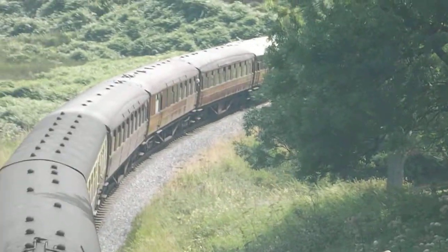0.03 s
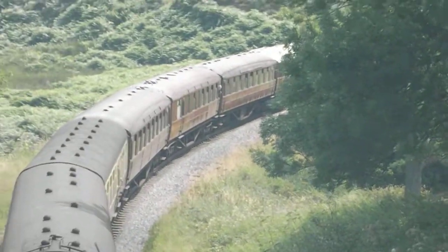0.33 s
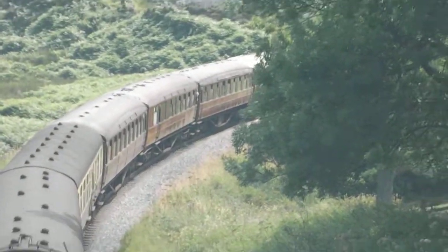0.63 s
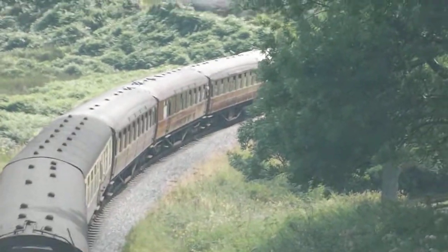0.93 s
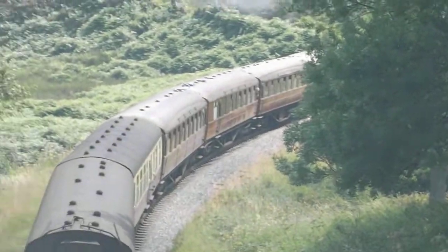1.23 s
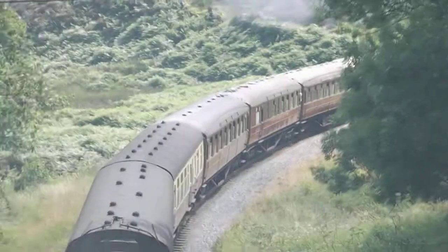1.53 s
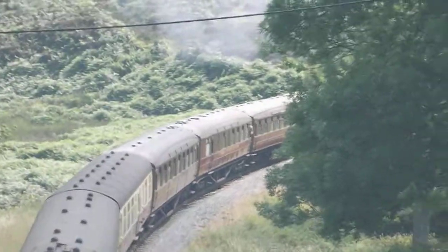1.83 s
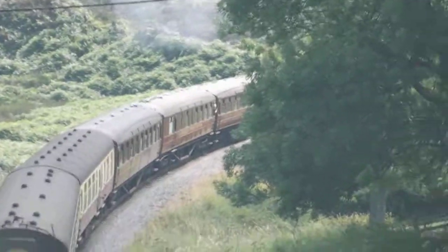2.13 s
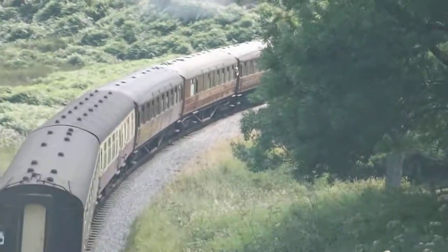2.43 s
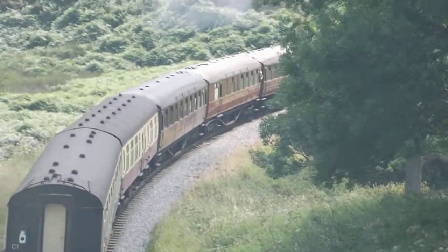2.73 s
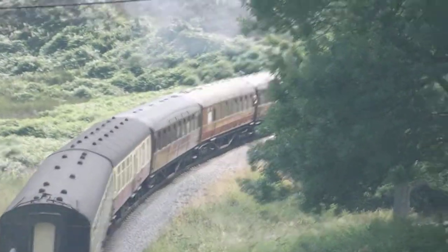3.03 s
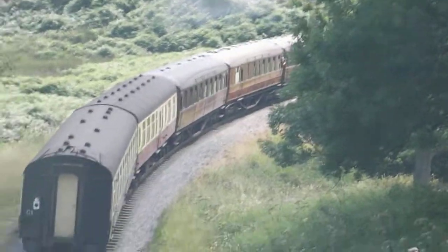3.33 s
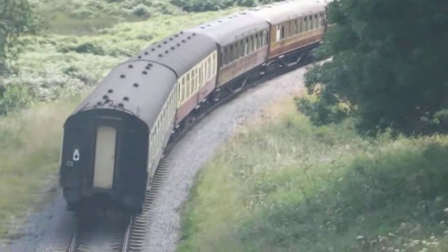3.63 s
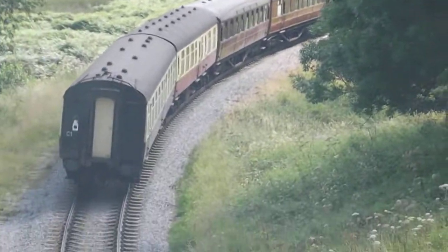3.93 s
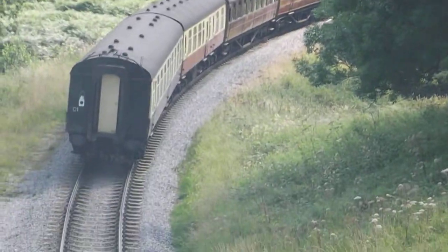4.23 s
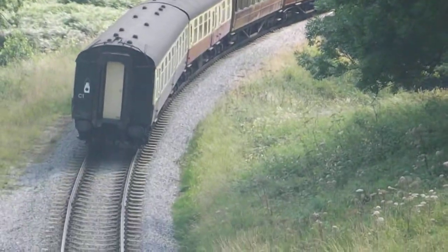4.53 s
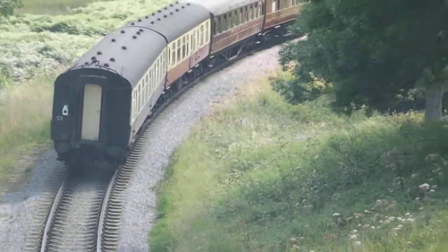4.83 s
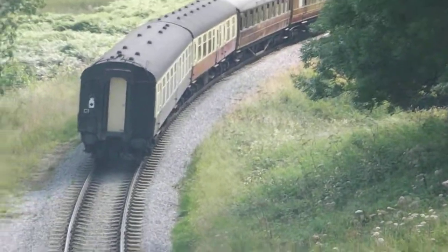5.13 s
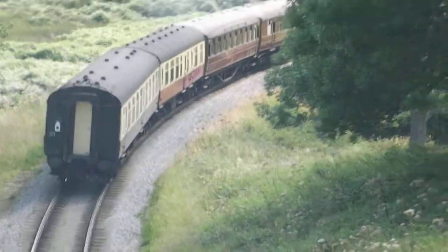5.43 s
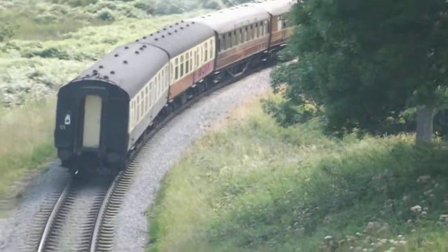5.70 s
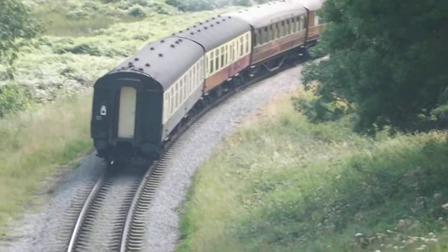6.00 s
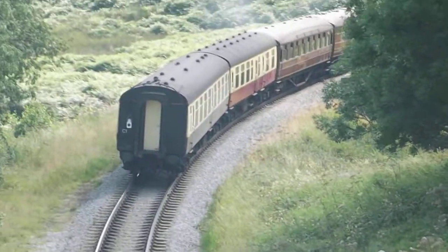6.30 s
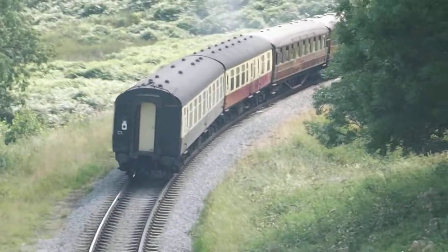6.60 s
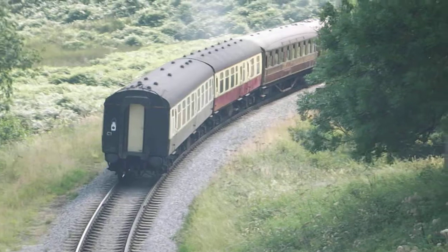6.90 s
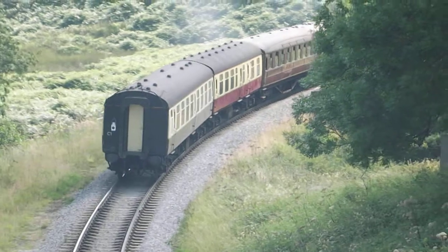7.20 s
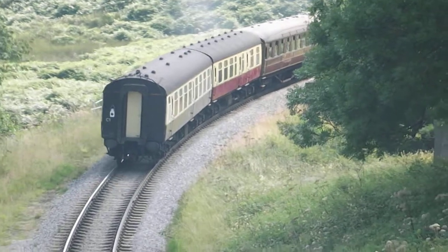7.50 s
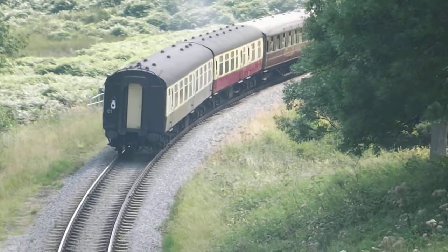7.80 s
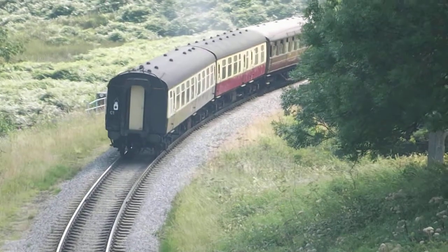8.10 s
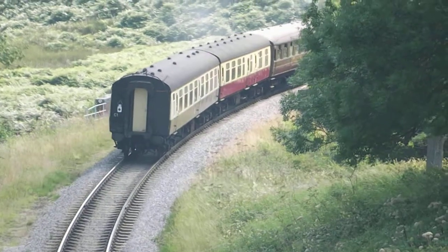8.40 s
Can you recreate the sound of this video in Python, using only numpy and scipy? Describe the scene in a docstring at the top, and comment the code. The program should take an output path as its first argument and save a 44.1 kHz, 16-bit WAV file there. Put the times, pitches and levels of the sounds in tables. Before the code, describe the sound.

Quick, steady chuffing of a departing steam train over a steam hiss and wheel rumble, with wind thumps and a few sharp clicks.

```python
"""A steam locomotive works a passenger train away round a curve in open country, 5.4 beats a second.
Each exhaust beat is a low push of air, a blast of steam with a rasp on top, and a hoot of the chimney,
coloured by the grass and echoed by the slopes. Under it sits a bed of leaking steam, rolling coaches
and rubbing flanges. A breeze buffets the microphone, a few sharp clicks sound close by,
and a limiter ducks the mix after the peaks."""
import sys
import numpy as np
from scipy import signal
from scipy.fft import rfft, irfft, next_fast_len
from scipy.io import wavfile

SR = 44100
rng = np.random.default_rng(int(sys.argv[2]) if len(sys.argv) > 2 else 0)


def master(y):
    """Save y as 16-bit WAV."""
    cut = np.clip(np.atleast_2d(y).T, -1, 1)
    pcm = np.round(cut * 32767)  # scale
    wavfile.write(sys.argv[1], SR, pcm.astype(np.int16))


N = 377055
TIME = np.arange(N) / SR
BEAT_S = 0.18532  # four beats to a turn of the driving wheels

# Table levels are relative: each layer is trimmed where it is played.
# Tone of each noise layer: (frequency [Hz], level [dB])
WIND_SPECTRUM = [(8, -27), (22, -1.5), (45, -5.5), (80, -6), (125, -13), (200, -26), (400, -27.5),
                 (900, -74)]
ROLL_SPECTRUM = [(60, -4), (140, 3), (260, 0), (420, -1.5), (580, -1), (760, -6), (900, -6.5), (1100, -7),
                 (1600, -9.5), (1760, -3), (1980, -10.5), (2400, -6.5), (3600, -26), (8000, -82)]
LEAK_SPECTRUM = [(1500, -12), (2400, -7.5), (3250, 3), (3650, -3.5), (4300, -15), (5000, -23), (5700, -32),
                 (6800, -28), (8200, -24.5), (9400, -27.5), (11000, -46), (15000, -67)]
FIZZ_SPECTRUM = [(5500, -20), (7000, -6.5), (8200, 1), (9400, -6), (11000, -20), (15000, -47)]
TICK_SPECTRUM = [(1500, -39), (3200, 7), (5200, -15), (8200, 10), (10000, 0.5), (13000, -9), (16000, -36)]
PUSH_SPECTRUM = [(25, -22), (50, -8), (80, -4), (108, -3), (160, -22), (400, -64)]
BLAST_SPECTRUM = [(40, -32), (100, -20.5), (155, 2.5), (250, 0), (320, 0), (355, -2), (410, 2), (475, -2),
                  (570, -2.5), (650, -7.5), (760, -19.5), (1100, -63), (3000, -90)]
RASP_SPECTRUM = [(500, -6), (720, -7), (840, 4.5), (1080, 0), (1230, 6), (1420, 3), (1900, 0.5),
                 (2600, -1.5), (3250, 1.5), (3650, -3.5), (4300, -18.5), (5700, -41), (8100, -27),
                 (13000, -61)]

# Fader ride of each layer: (time [s], level [dB])
WIND_LEVEL = [(0, -38), (0.25, -40), (0.55, -30), (0.9, -45), (1.7, -41), (3.0, -41.5), (3.7, -29),
              (4.7, -28.5), (4.95, -32), (5.45, -39), (5.8, -28), (6.6, -46), (7.3, -39.5), (8.55, -42.5)]
ROLL_LEVEL = [(0, -33), (0.7, -32.5), (1.0, -33.5), (2.0, -31), (3.3, -33), (5.0, -33.5), (6.0, -32.5),
              (7.1, -32), (7.95, -34.5), (8.55, -34)]
FLANGE_LEVEL = [(0, -45), (1.1, -44), (1.3, -26), (1.55, -57), (1.85, -38), (2.2, -44), (5.5, -46.5),
                (6.6, -43.5), (6.85, -37), (7.25, -41), (7.5, -51), (8.55, -40)]
LEAK_LEVEL = [(0, -29), (.8, -31.5), (1.4, -28.5), (2.2, -32), (3.3, -34), (4.6, -34.5), (5.4, -34.5),
              (6.1, -33), (7.2, -36), (8.55, -35)]
FIZZ_LEVEL = [(0, -41.5), (.6, -38.5), (1.4, -39), (2.2, -45.5), (3.3, -45.5), (4.5, -50), (8.55, -50)]
BLAST_LEVEL = [(0.01, -17.5), (0.35, -18.5), (0.55, -15.5), (0.73, -18.5), (1.09, -15), (1.29, -18),
               (2.57, -15.5), (3.13, -19.0), (3.87, -16.5), (4.99, -18.5), (5.91, -16), (6.28, -18.5),
               (7.21, -14.0), (7.76, -20), (8.51, -22.0)]
RASP_LEVEL = [(0.01, -17.5), (0.91, -20), (1.29, -15), (2.21, -22.5), (2.77, -18), (3.51, -22.5),
              (4.6, -24.5), (4.99, -28.5), (5.17, -24), (6.47, -24.0), (7.01, -19), (7.21, -22), (7.4, -20),
              (7.97, -28), (8.33, -22.5), (8.51, -26.1)]
HOOT_LEVEL = [(0.01, -11), (0.17, -23), (0.55, -15.9), (1.29, -22), (1.47, -33), (1.83, -18.5),
              (3.13, -19.5), (3.69, -15), (4.05, -19), (6.66, -16), (7.01, -27), (7.21, -21), (8.51, -18.5)]

# Single thumps of wind: (time [s], level [dB], half length [s])
BUFFETS = [(0.557, -26, .025), (3.59, -22, 0.022), (4.072, -17.5, 0.023), (4.199, -15, 0.019),
           (4.285, -21, .025), (4.404, -19.5, .025), (4.542, -16.5, .025), (4.62, -21, 0.059),
           (5.616, -14.5, 0.017), (6.054, -26, .025), (6.807, -26, 0.021), (7.154, -26, .025)]
# Close clicks: (time [s], knock [dB], tick [dB], tilt of the upper modes [dB/octave])
CLICKS = [(2.9138, -15, -13, 10), (2.918, -15, -19, 2), (2.9897, -6.5, -19, -21), (3.0406, -2, -33, -21),
          (3.0520, -6, -23.5, -9), (3.087, -2.5, -10, -2), (3.094, -1.5, -11.5, -3), (3.1028, 1, -19, 1),
          (4.8808, 1.5, -18, -8), (4.8830, 13, 1.5, 0.5), (4.8850, 12.5, -4, 3), (4.8900, 14, -4, -6),
          (5.1646, -28, -19, -6), (5.8348, -33, -21, -6)]
# Hollow ring of a click: (frequency [Hz], level [dB], t60 [s])
CLICK_MODES = [(1826, 4, 0.017), (1910, -4.5, 0.016), (1390, 4, 0.0061), (910, -10, 0.011),
               (2224, -6, 0.02), (2906, 7, 0.0069), (3150, 6, 0.01)]
# Resonances of the wheel flanges and of the chimney: (frequency [Hz], width [Hz], level [dB])
FLANGE_MODES = [(1256, 130, -1.5), (1396, 71, 5.5)]
CHIMNEY_MODES = [(197, 21.9, -1.5), (159.6, 25.5, -7)]
# Midrange lift or dip from the ground reflection: (time [s], gain [dB])
GROUND_GAIN = [(0, 0), (2, 4), (3.3, 2), (5.5, -5.5), (8.55, -2.5)]
# Hissing half of the rasp against its throaty half: (time [s], balance [dB])
RASP_BRIGHTNESS = [(0.01, 5.5), (0.91, 4.1), (1.29, -1.5), (2.39, 4.5), (4.25, -6.5), (6.09, -1),
                   (6.47, -4.5), (7.21, -10), (7.76, 3.5), (8.51, -4)]
# Drift of the wheels from an even pace: (time [s], lag [s])
WHEEL_LAG = [(0, 0.01), (.17, -0.0075), (2.8, -0.013), (3.2, -0.0092), (3.5, -.016), (5.8, -.02),
             (6.3, -0.011), (7.1, -0.017), (8.0, -0.0018), (8.55, 0.0017)]
# Groove of the unevenly set valves, a row for each beat of a wheel turn:
# (lateness [s], blast [dB], rasp [dB], hoot [dB], length [factor])
VALVE_GROOVE = [(0.001, 0.94, 0.2, -1.0, 0.98), (-0.0093, 2.07, 2.77, 2.1, 0.98),
                (-0.014, -2.2, -2.5, 1.1, 1.12), (0.0026, -0.9, 0.5, -0.2, 1.05)]


def amp(db):
    """Decibels to gain."""
    return 10 ** (np.asarray(db) / 20)


def unit(x):
    """Scales to an rms of 1."""
    return x / np.sqrt(np.mean(x ** 2) + 1e-20)


def fader(rows):
    """Gain over time from rows of (time [s], level [dB])."""
    return amp(np.interp(TIME, *np.transpose(rows)))


def colour(x, spectrum):
    """Equalises x with rows of (frequency [Hz], level [dB]), to an rms of 1."""
    hz, db = np.transpose(spectrum)
    size = next_fast_len(N)
    gain = amp(np.interp(np.log(np.fft.rfftfreq(size, 1 / SR) + 1), np.log(hz), db))
    return unit(irfft(rfft(x, size) * gain, size)[:N])


def flutter(rate_hz):
    """A random modulator of rms 1 that glides to a new value rate_hz times a second."""
    knots = rng.standard_normal(N // 8)
    return unit(np.interp(TIME * rate_hz, np.arange(len(knots)), knots))


def turbulence(rough_db, rate_hz):
    """Noise that comes in uneven lumps."""
    return rng.standard_normal(N) * amp(rough_db * flutter(rate_hz))


def resonate(x, hz, width_hz):
    """A resonance with steep skirts and a complex output."""
    pole = np.exp((2j * hz - width_hz) * np.pi / SR)
    return signal.lfilter([1], [1, -2 * pole, pole ** 2], x)


def steadied(analytic, firmness):
    """The real part of an analytic signal, its swings of level partly evened out."""
    return unit(analytic.real / (abs(analytic) + 1e-9) ** firmness)


def wind():
    """Eddies on the microphone: a lumpy low breeze with a few harder buffets."""
    eddies = signal.hilbert(colour(turbulence(rough_db=2.0, rate_hz=23), WIND_SPECTRUM))
    breeze = fader(WIND_LEVEL) * amp(2.0 * flutter(rate_hz=9.1))
    buffets = sum(amp(db) * np.exp(-((TIME - s) / half) ** 2) for s, db, half in BUFFETS)
    return steadied(eddies, firmness=0.23) * np.hypot(breeze, buffets)


def coaches():
    """The roar of wheels on rails, and the hollow ring of flanges rubbing round the curve."""
    roll = colour(turbulence(rough_db=2.5, rate_hz=35), ROLL_SPECTRUM) * fader(ROLL_LEVEL) * amp(1.0)
    rub = turbulence(rough_db=3.0, rate_hz=27)
    flanges = unit(sum(amp(db) * unit(resonate(rub, hz, width).real) for hz, width, db in FLANGE_MODES))
    return roll + flanges * fader(FLANGE_LEVEL)


def leaking_steam():
    """A steady leak, with a thin fizz on top that fades as the engine draws away."""
    leak = colour(turbulence(rough_db=1.5, rate_hz=40), LEAK_SPECTRUM) * fader(LEAK_LEVEL)
    fizz = colour(rng.standard_normal(N), FIZZ_SPECTRUM) * fader(FIZZ_LEVEL) * amp(-9.5)
    return leak + fizz


def clicks(tick_decay_s=0.0011, ring_attack_s=0.0019):
    """Each click is a very short tick of noise followed by a hollow, ringing knock."""
    t = TIME[:2048]
    hz, mode_db, t60 = np.transpose(CLICK_MODES)[:, :, None]
    octaves_up = np.maximum(np.log2(hz / hz[0]), 0)
    modes = amp(mode_db - 60 * t / t60) * np.sin(2 * np.pi * hz * t) * (1 - np.exp(-t / ring_attack_s))
    knocks, tick_envelope = np.zeros((2, N))
    for s, knock_db, tick_db, tilt_db in CLICKS:
        here = round(s * SR) + np.arange(len(t))
        knocks[here] += (amp(knock_db + tilt_db * octaves_up) * modes).sum(0)
        tick_envelope[here] += amp(tick_db) * np.exp(-t / tick_decay_s)
    ticks = tick_envelope * colour(rng.standard_normal(N), TICK_SPECTRUM)
    return amp(-1.5) * knocks + amp(-7.5) * ticks


def hillside(x, t60, dull_hz, echoes_per_s=900):
    """A dull tail of scattered echoes from the trees and slopes."""
    t = TIME[:SR]
    taps = rng.standard_normal(SR) * (rng.random(SR) < echoes_per_s / SR)
    taps *= amp(-60 * t / t60) * (1 - np.exp(-t / 0.0054))
    echoes = signal.fftconvolve(x, taps / np.linalg.norm(taps))[:N]
    return signal.lfilter(*signal.butter(1, dull_hz, fs=SR), echoes)


def over_ground(x, hz):
    """The reflection from the grass lifts one band at first, then scoops it as the engine draws away."""
    bandpass = signal.butter(1, [hz / 1.3, hz * 1.26], "bandpass", fs=SR, output="sos")
    return x + (fader(GROUND_GAIN) - 1) * signal.sosfiltfilt(bandpass, x)


def second_path(x, share, delay_s, wander):
    """A slightly longer path shifts with the breeze and gives each beat its own hollow colour."""
    late = np.interp(TIME - delay_s * np.exp(wander * flutter(rate_hz=4)), TIME, x)
    return (x + share * late) / np.hypot(1, share)


def strokes(scatter_db=0.55, length_scatter=0.035, stretch_per_db=0.0151, usual_blast_db=-17.5):
    """The rhythm of the driving wheels: time, length factor and three levels for every beat."""
    count = np.arange(int(N / SR / BEAT_S) + 1)
    late, blast_db, rasp_db, hoot_db, lengths = np.array(VALVE_GROOVE)[count % len(VALVE_GROOVE)].T
    even_times = count * BEAT_S
    times = even_times + np.interp(even_times, *np.transpose(WHEEL_LAG)) + late
    strength, stretch = rng.standard_normal((len(count), 2)).T
    for db, ride in [(blast_db, BLAST_LEVEL), (rasp_db, RASP_LEVEL), (hoot_db, HOOT_LEVEL)]:
        db += np.interp(times, *np.transpose(ride)) + scatter_db * strength
    # harder beats last a little longer
    lengths *= np.exp(length_scatter * stretch + stretch_per_db * (blast_db - usual_blast_db))
    return times, lengths, blast_db, rasp_db, hoot_db


def puffs(times, lengths, levels_db, lead_s, rise_s, fall_s):
    """The beat envelope: it swells as the exhaust valve opens and dies as the cylinder empties."""
    power = np.zeros(N)
    for s, length, db in zip(times, lengths, levels_db):
        near = slice(*np.searchsorted(TIME, [s - .15, s + .3]))
        t = (TIME[near] - s + lead_s) / length
        shape = np.where(t < 0, np.exp(-(t / rise_s) ** 2), np.exp(1 - np.hypot(1, t / fall_s)))
        power[near] += (amp(db) * shape) ** 2
    return np.sqrt(power)


def air_push(times, lengths, db):
    """The low push of air that opens each beat."""
    air = colour(rng.standard_normal(N), PUSH_SPECTRUM)
    return air * puffs(times, lengths, db, lead_s=0.025, rise_s=0.021, fall_s=0.013)


def chimney_hoot(times, lengths, db):
    """The draught rings the chimney: a hoot that builds during the blast and outlasts it."""
    draught = rng.standard_normal(N)
    ring = sum(amp(mode_db) * steadied(resonate(draught, hz, width), firmness=0.74)
               for hz, width, mode_db in CHIMNEY_MODES)
    return unit(ring) * puffs(times, lengths, db, lead_s=-0.012, rise_s=0.034, fall_s=0.023)


def steam_rasp(times, lengths, db, notch_spacing_hz=395, crossover_hz=2100):
    """The gritty top of the steam jet, tipping between throaty and hissing."""
    grit = colour(turbulence(rough_db=2.0, rate_hz=400), RASP_SPECTRUM)
    # the open top of the chimney sends back an inverted reflection that notches the rasp
    grit = unit(grit - 0.16 * np.interp(TIME - 1 / notch_spacing_hz, TIME, grit))
    throaty = signal.sosfiltfilt(signal.butter(3, crossover_hz, fs=SR, output="sos"), grit)
    tip = np.sqrt(fader(RASP_BRIGHTNESS))
    rasp = throaty / tip + (grit - throaty) * tip
    return rasp * puffs(times, lengths, db, lead_s=0.0022, rise_s=0.023, fall_s=0.018)


def steam_blast(times, lengths, db):
    """The body of each beat: a turbulent jet of steam, full in the low mids."""
    jet = colour(turbulence(rough_db=-0.5, rate_hz=170), BLAST_SPECTRUM)
    body = steadied(signal.hilbert(jet), firmness=0.078)
    return body * puffs(times, lengths, db, lead_s=0.0053, rise_s=0.022, fall_s=0.019)


def exhaust():
    """The chuff of the locomotive: blast, push, rasp and hoot layered on every beat."""
    times, lengths, blast_db, rasp_db, hoot_db = strokes()
    blast = steam_blast(times, lengths, blast_db + 2.5)
    push = air_push(times, lengths, blast_db - 14.5)
    rasp = steam_rasp(times, lengths, rasp_db + 1.0)
    hoot = chimney_hoot(times, lengths, hoot_db - 1.4)
    return second_path(blast + rasp, share=0.29, delay_s=.003, wander=.35) + hoot + push


def scene():
    """The mono mix: the train, its echoes, the breeze, the clicks and a faint even hiss."""
    engine = over_ground(exhaust(), hz=750)
    echoes = amp(-12.5) * hillside(engine, t60=0.72, dull_hz=2500)
    hiss = amp(-60.5) * rng.standard_normal(N)
    return (engine + echoes + leaking_steam() + coaches() + wind() + clicks() + hiss)[None]


def ducking_db(x, block=64, threshold_db=-2.5, step_db=1.77, recover_db_per_s=71):
    """Gain reduction: one abrupt step down at each crest that overshoots, then a steady recovery."""
    blocks = abs(np.pad(x, (0, -N % block))).reshape(-1, block)
    crests = np.arange(len(blocks)) * block + blocks.argmax(axis=1)
    recovery_db = recover_db_per_s * block / SR
    ducks = [0]
    for peak_db in 20 * np.log10(blocks.max(axis=1) + 1e-9):
        duck = ducks[-1]
        ducks.append(duck + step_db if peak_db - duck > threshold_db else max(duck - recovery_db, 0))
    return np.repeat(ducks, np.diff(np.r_[0, crests, N]))


def record(dry):
    """The master chain: a limiter whose steps tick on the hardest peaks, a hard ceiling, a high cut."""
    ducked = dry / amp(ducking_db(dry[0]))
    high_cut = signal.firwin(511, cutoff=15900, window=("kaiser", 9), fs=SR)
    return signal.oaconvolve(np.clip(ducked, -1, 1), high_cut[None], "same")


dry = scene()
out = record(dry)
master(out)
```